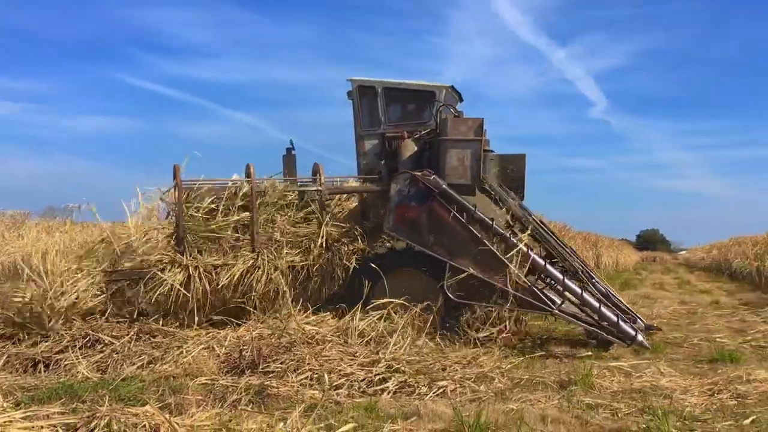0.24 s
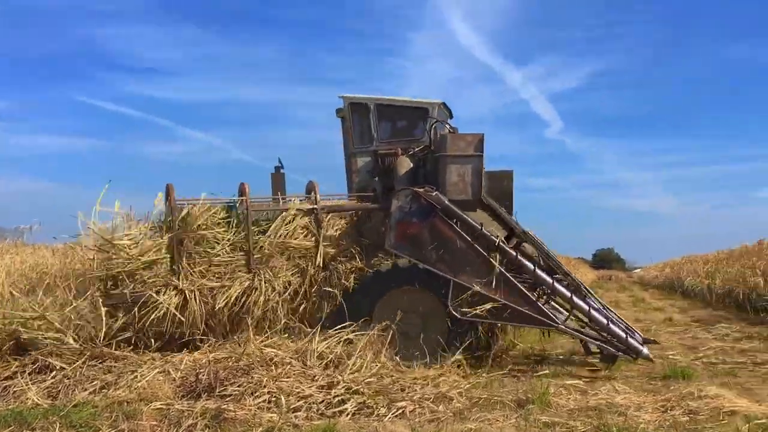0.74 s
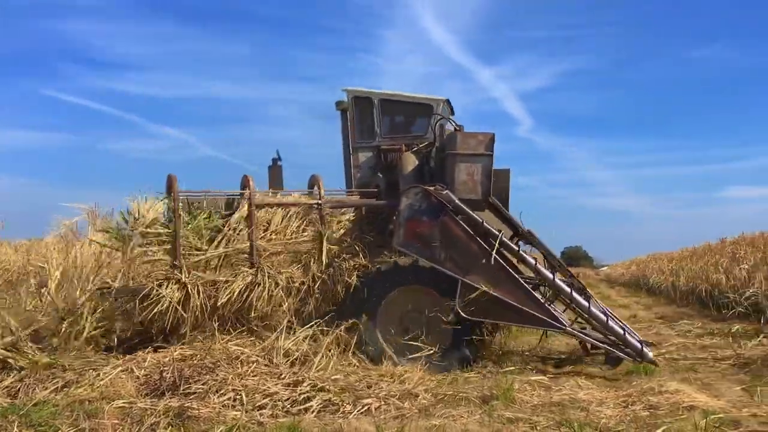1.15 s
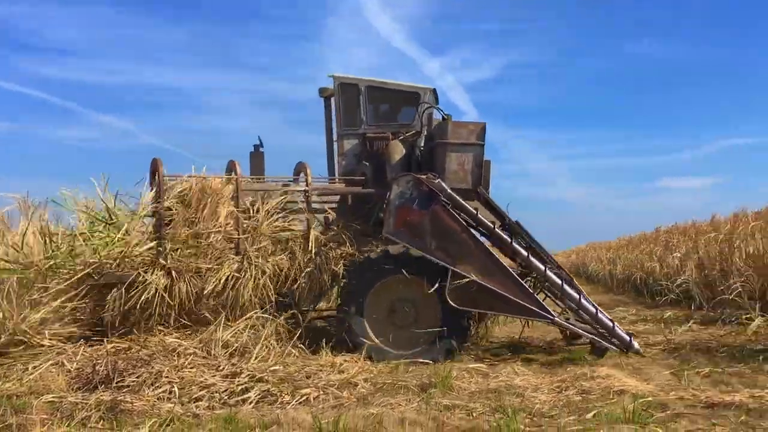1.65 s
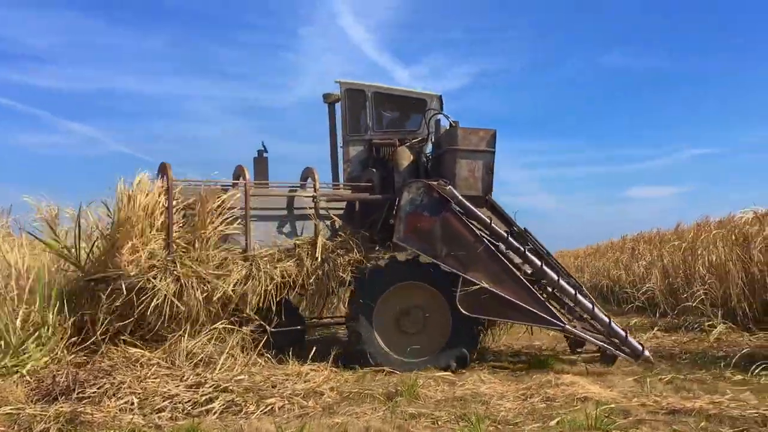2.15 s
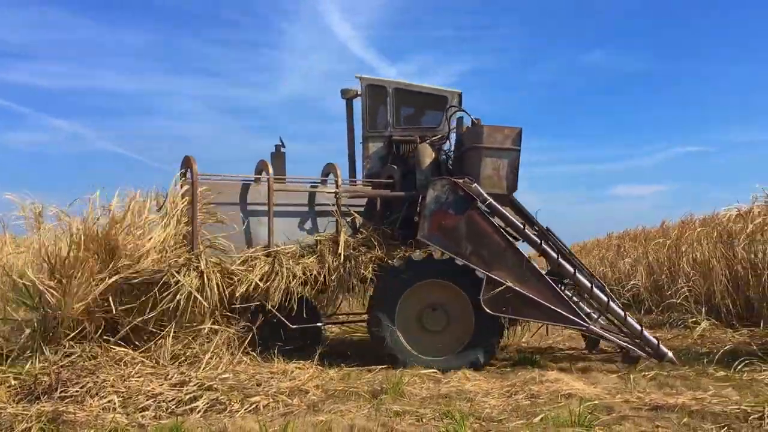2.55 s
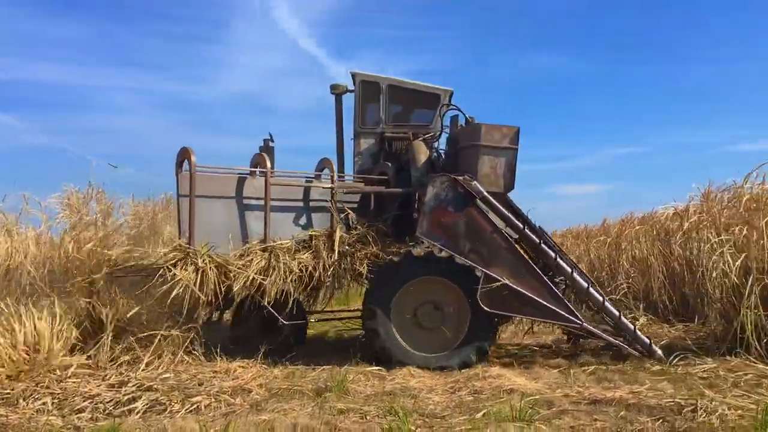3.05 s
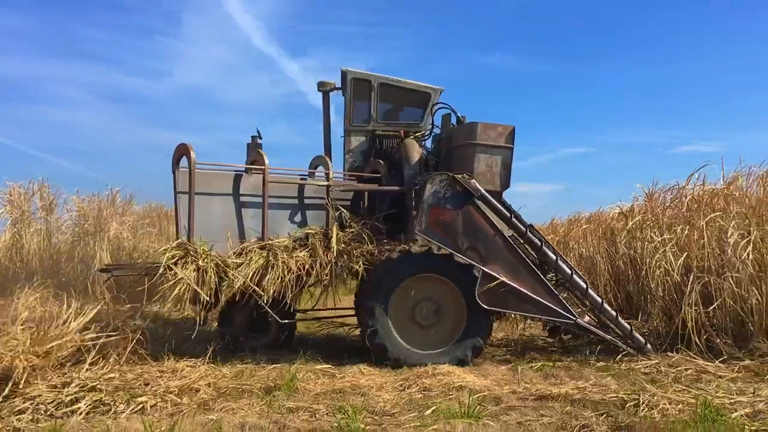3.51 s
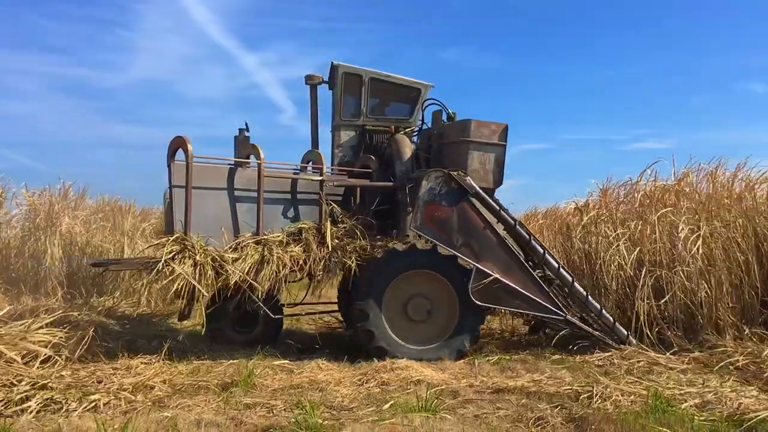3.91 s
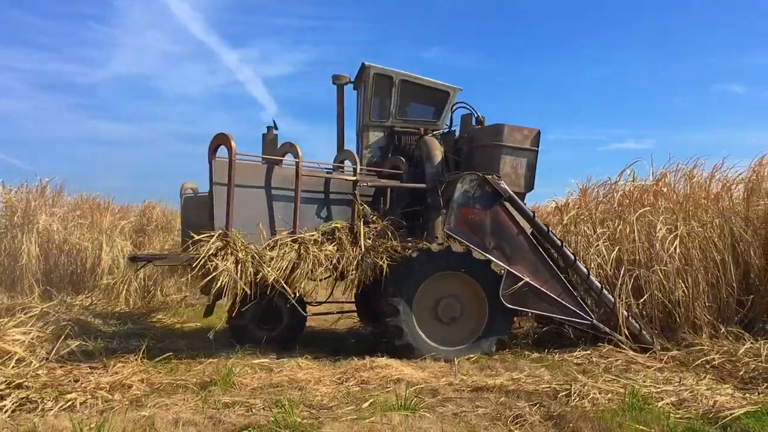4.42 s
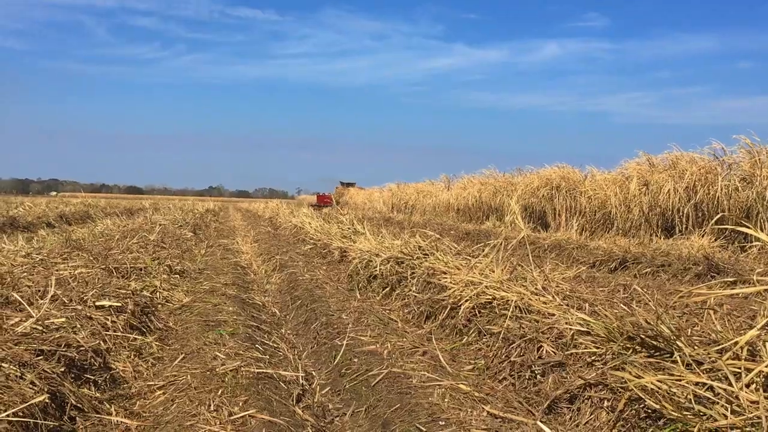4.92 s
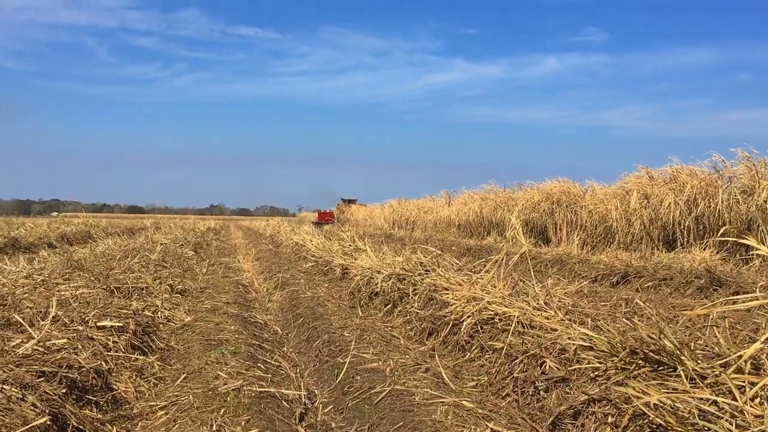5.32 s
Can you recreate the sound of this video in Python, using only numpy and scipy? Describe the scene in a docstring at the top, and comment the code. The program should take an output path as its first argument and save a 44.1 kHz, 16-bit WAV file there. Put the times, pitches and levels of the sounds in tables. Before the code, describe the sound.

A large diesel harvester runs at steady speed close to the microphone in an open cane field from 0 to about 4.6 seconds. A low, even hum near 100 hertz with its octave sits under rumbling exhaust, a broad midrange clatter and faint gear and fan whine. Dry stalks thrash in a bright, crackling hiss. Metal conveyor clanks recur roughly every quarter second, and short, rough high chain squeaks appear at the start, around 0.6 to 0.8, near 3.0 and in a cluster around 4.1 to 4.6. From 2 to 3.6 seconds the low hum strengthens while the cane hiss eases slightly; rumble swells gently around 2.5. Low wind gusts are mostly masked. At 4.63 the sound stops abruptly, leaving a tiny gap. From 4.66 to the end, a far quieter, airy machine roar fades gradually over barely audible hum, with brief dry leaf rustles and soft low wind buffeting.

```python
"""In a cane field, a six-cylinder diesel harvester works past at close range: firing-rate tones, noise bursts
for exhaust and clatter, gear and fan tones, and dry cane made of patchy, crackling noise.
Noise blows on a resonant frame clank once a conveyor turn, rough sine chirps are the chains.
After an abrupt cut the machine is far down the field, with noise-made dry leaves and wind on the microphone."""
import sys
import numpy as np
from scipy import signal
from scipy.fft import rfft, irfft, next_fast_len
from scipy.io import wavfile
from scipy.ndimage import uniform_filter1d, map_coordinates

SR = 44100
rng = np.random.default_rng(int(sys.argv[2]) if len(sys.argv) > 2 else 0)


def store_pcm(level_fs):
    """Save levels as 16-bit WAV."""
    pcm = np.round(np.clip(level_fs, -1, 1) * 32767).astype(np.int16)
    wavfile.write(sys.argv[1], SR, np.atleast_2d(pcm).T)


N = 245637

# Lines of the unequal cylinders: order [multiples of the four-stroke cycle rate]
UNEVEN_ORDERS = [4, 18, 22, 24, 36, 51, 54, 57, 66, 99]
# Level of each of those lines: level_db [dB]
UNEVEN_LEVELS = [-40, -54.5, -49, -44.5, -51, -48, -46, -45.5, -49, -49]
# Spectra, before scaling to rms 1: pitch_hz [Hz], level_db [dB, relative]
# Exhaust rumble; the reflection off the ground hollows out 500 Hz: pitch_hz, level_db
EXHAUST_SPECTRUM = [(20, -42), (32, -19), (45, -14.5), (80, -7.5), (115, -1), (150, 3), (185, -2.5),
                    (220, -6.5), (275, -6), (370, -6), (430, -14.5), (490, -22), (700, -45)]
# Diesel clatter and machinery: pitch_hz, level_db
CLATTER_SPECTRUM = [(250, -22), (480, -13.5), (600, -2), (760, -0.5), (950, 2.5), (1130, -1), (1450, -2),
                    (1900, -4.5), (2350, -8.5), (2550, -7), (3050, -15.5), (5000, -17.5), (10000, -36.5)]
# Dry stalks thrashing: pitch_hz, level_db
CANE_SPECTRUM = [(1200, -13), (2800, -2), (3500, 2), (4400, -2), (4900, -3.5), (5800, 2.5), (6900, 0),
                 (8500, 1), (9800, -2), (10500, -7), (11800, -5), (13500, -9), (15800, -14)]
# Roar of the far machine: pitch_hz, level_db
FAR_SPECTRUM = [(150, -27), (240, -7.5), (400, -6), (520, -10.5), (750, -4), (950, -1.5), (1400, 2),
                (1900, 0), (2500, -3.5), (3800, -5.5), (4500, -10), (6000, -27), (8000, -37)]
# Dry leaves stirring: pitch_hz, level_db
LEAF_SPECTRUM = [(3000, -15), (5000, -1), (5600, 5), (6700, 2.5), (7500, -2.5), (8600, -0.5), (9500, -5),
                 (10600, -12), (12500, -14), (15800, -28)]
# Wind on the microphone: pitch_hz, level_db
WIND_SPECTRUM = [(20, -42), (31, -28), (41, -2.5), (65, -7), (120, -14), (180, -18.5), (240, -23.5),
                 (320, -37), (600, -57)]
# Resonances of the conveyor frame: pitch_hz [Hz], width_hz [Hz], level_db [dB, relative]
FRAME_MODES = [(1560, 570, 2.5), (2740, 520, 2.5), (4400, 750, -2.5), (6260, 1200, -6.5), (9150, 2000, -14)]
# Loud chain chirps: peak_s [s], pitch_hz [Hz], half_length_s [s], level_db [dB, peak]
LOUD_CHIRPS = [(.045, 7550, 0.031, -30.5), (.582, 7350, .02, -30.5), (.657, 8050, .028, -34),
               (.772, 9900, .018, -33), (1.775, 13000, .022, -37), (3.017, 5800, 0.013, -28.5),
               (3.072, 5750, .014, -33), (4.084, 9460, .03, -30.5), (4.128, 5550, .015, -31),
               (4.14, 9900, .025, -36), (4.197, 7270, 0.015, -31), (4.438, 5850, .035, -36.5),
               (4.568, 7600, .028, -33.5)]
# Swell of the cooling fan tones: peak_s [s], half_length_s [s], level_db [dB]
FAN_SWELLS = [(.95, 0.38, -39)]
# Swell of the gear whine as the gearbox comes abreast: peak_s [s], half_length_s [s], level_db [dB]
GEAR_SWELLS = [(4.27, 0.6, -38)]
# Conveyor strikes with their own time and level: start_s [s], level_db [dB, before the frame]
LISTED_STRIKES = [(.773, -29.5), (1.326, -33), (1.587, -34.5), (2.134, -31.5), (2.67, -30)]
# Gusts on the microphone: peak_s [s], half_length_s [s], level_db [dB]
WIND_GUSTS = [(.2, 0.17, -38), (1.82, .16, -36), (3.52, 0.32, -33), (4.3, 0.4, -38), (4.768, 0.025, -37)]
# Brief stirs of the leaves: peak_s [s], half_length_s [s], level_db [dB]
LEAF_STIRS = [(4.74, 0.21, -55), (5.28, .09, -52.5), (5.57, 0.088, -56)]

TOP_HZ = 15800
CYLINDERS = 6
NEAR_FIRING_HZ, FAR_FIRING_HZ = 98.35, 96.6
# The close view ends, then the far view starts; the fade-out is a time constant
CUT_S, RESUME_S = 4.629, 4.664
FADE_OUT_S, FADE_IN_S = 0.0032, 0.017
# The cane chute moves off and the engine side comes round between these times
TURN_FROM_S, TURN_TO_S = 1.94, 3.57
# Level with the chute facing, and the change once the engine side faces
DRONE_DB, DRONE_GAIN_DB = -30.5, 6
CLATTER_DB, CLATTER_GAIN_DB = -29, 0.52
CANE_DB, CANE_GAIN_DB = -33, -3
# The drone's octave dips slowly as the machine turns
OCTAVE_DB, DIP_DB, DIP_AT_S, DIP_HALF_S = -33.5, 12, 2.86, 1.6
# Exhaust and clatter swell as the machine passes closest
EXHAUST_DB, EXHAUST_SWELL_DB, CLATTER_SWELL_DB = -29, 2.5, 0.86
CLOSEST_AT_S, CLOSEST_HALF_S = 2.54, 2.6
GEAR_DB, FAN_DB = -44, -46.5
# Conveyor: clank levels are before the frame and its gain
FIRST_CLANK_S, TURN_S = 0.226, 0.2725
CLANK_DB, CLANK_SCATTER_DB, FRAME_GAIN_DB = -34, 0.8, 14.5
FAINT_CHIRP_DB, FAINT_CHIRP_HALF_S, FAINT_LOW_HZ, FAINT_HIGH_HZ = -43, 0.016, 5420, 10030
NEAR_WIND_DB, FAR_WIND_DB = -43, -45.5
FAR_DB, FAR_FADE_DB_PER_S = -41.5, 4
LEAVES_DB = -57.5


def amp(db):
    """Decibels to gain."""
    return 10 ** (np.asarray(db) / 20)


def unit(x):
    """Scale to rms 1."""
    return x / np.sqrt(np.mean(x ** 2) + 1e-20)


def clock():
    """The time of each sample in seconds."""
    return np.arange(N) / SR


def wobble(rate_hz):
    """A smooth random curve with rate_hz knots a second."""
    knots = rng.standard_normal(int(N * rate_hz / SR) + 4)
    return map_coordinates(knots, [clock() * rate_hz])


def noise():
    """Fresh white noise."""
    return rng.standard_normal(N)


def filtered(x, response):
    """Shape x with a frequency response, padded so that the tail does not wrap."""
    size = next_fast_len(N + 8192)
    return irfft(rfft(x, size) * response(np.fft.rfftfreq(size, 1 / SR)), size)[:N]


def coloured(x, spectrum):
    """Shape x through spectrum points on a log pitch axis, at rms 1."""
    pitch_hz, level_db = np.transpose(spectrum)
    return unit(filtered(x, lambda hz: amp(np.interp(np.log(hz + 1), np.log(pitch_hz), level_db))))


def blend(a, b, share):
    """Mix two textures so that b has the given share of the power."""
    return np.sqrt(1 - share) * unit(a) + np.sqrt(share) * unit(b)


def bump(peak_s, half_s):
    """A smooth rise to 1 at peak_s and an equal fall."""
    return np.cos(np.pi / 2 * np.clip((clock() - peak_s) / half_s, -1, 1)) ** 2


def swells(rows, steady_db):
    """Gain of a steady level and smooth swells, summed in power."""
    power = amp(steady_db) ** 2
    for peak_s, half_s, level_db in rows:
        power = power + (amp(level_db) * bump(peak_s, half_s)) ** 2
    return np.sqrt(power)


def facing():
    """0 while the cane chute faces the listener, rising to 1 as the engine side comes round."""
    return np.clip((clock() - TURN_FROM_S) / (TURN_TO_S - TURN_FROM_S), 0, 1)


def crank(firing_hz, hunt_hz=0.1176):
    """Engine cycles turned so far; the governor hunts a little around its speed."""
    return np.cumsum(firing_hz + hunt_hz * wobble(2)) / SR / CYLINDERS


def tone(cycle, order, waver_db, drift_rad=0):
    """A multiple of the engine cycle at rms 1; level and phase waver in the moving air."""
    phase = 2 * np.pi * (order * cycle + rng.random()) + drift_rad * wobble(12)
    return unit(amp(waver_db * wobble(9)) * np.sin(phase))


def firings(cycle, uneven_db, decay, repeat):
    """A noise burst per cylinder, decay in firing intervals; a share of its power repeats each cycle."""
    stroke = cycle * CYLINDERS
    cylinder = np.arange(CYLINDERS)
    imbalance = np.sin(2 * np.pi * cylinder / CYLINDERS) + (cylinder % 3 == 0) - 1 / 3
    strength = amp(uneven_db * unit(imbalance))
    burst = strength[stroke.astype(int) % CYLINDERS] * np.exp(-(stroke % 1) / decay)
    pattern = rng.standard_normal(int(N / cycle[-1]))
    same = map_coordinates(pattern, [cycle % 1 * len(pattern)], mode="grid-wrap")
    return unit(burst * blend(noise(), same, repeat))


def crackle(rate_hz, spread_db):
    """Random tiny snaps with a short ring-down, a few much larger than the rest."""
    size = amp(spread_db * np.minimum(rng.exponential(size=N), 5))
    snaps = (rng.random(N) < rate_hz / SR) * size ** 2
    power = signal.lfilter([1], [1, -np.exp(-1 / (0.00085 * SR))], snaps)  # 0.85 ms power decay
    return unit(np.sqrt(np.abs(power)) * noise())


def patchy(x, depth_db):
    """Ever-changing stalks and panels ring: narrow patches of the spectrum swell and fade."""
    spectrum = signal.stft(x, nperseg=1024)[2]
    field = uniform_filter1d(rng.standard_normal(spectrum.shape), size=5, axis=0)  # across pitch
    field = uniform_filter1d(field, size=6, axis=1)  # across time
    return unit(signal.istft(spectrum * amp(depth_db * unit(field)), nperseg=1024)[1][:N])


def exhaust_drone(cycle):
    """The firing rate and its octave hum as two tones."""
    drone = amp(DRONE_DB + DRONE_GAIN_DB * facing()) * tone(cycle, order=6, waver_db=0)
    octave_db = OCTAVE_DB - DIP_DB * bump(DIP_AT_S, DIP_HALF_S)
    return drone + amp(octave_db) * tone(cycle, order=12, waver_db=0.5)


def uneven_cylinders(cycle):
    """Unequal cylinders add wavering lines at multiples of the cycle rate."""
    return sum(amp(level_db) * tone(cycle, order, waver_db=2.5, drift_rad=0.53)
               for order, level_db in zip(UNEVEN_ORDERS, UNEVEN_LEVELS))


def gear_whine(cycle):
    """The timing gear sings at a high multiple of the engine cycle."""
    return swells(GEAR_SWELLS, GEAR_DB) * tone(cycle, order=88, waver_db=2.5, drift_rad=0.9)


def cooling_fan(cycle):
    """The fan and its drive make a pair of tones locked to the engine."""
    pair = tone(cycle, order=39.5, waver_db=2, drift_rad=0.4)
    pair += 0.9 * tone(cycle, order=36, waver_db=2, drift_rad=0.4)
    return swells(FAN_SWELLS, FAN_DB) * pair


def exhaust_rumble(cycle):
    """Exhaust puffs, one noise burst a firing, give the low rumble."""
    level_db = EXHAUST_DB + EXHAUST_SWELL_DB * bump(CLOSEST_AT_S, CLOSEST_HALF_S)
    return amp(level_db) * coloured(firings(cycle, uneven_db=0, decay=4.8, repeat=0.042), EXHAUST_SPECTRUM)


def diesel_clatter(cycle):
    """Combustion knocks excite ringing panels and blur into a machinery roar."""
    knocks = patchy(firings(cycle, uneven_db=-0.15, decay=11, repeat=0.098), depth_db=0.9)
    level_db = CLATTER_DB + CLATTER_GAIN_DB * facing()
    level_db += CLATTER_SWELL_DB * bump(CLOSEST_AT_S, CLOSEST_HALF_S) + 0.26 * wobble(24.24)
    return amp(level_db) * coloured(knocks, CLATTER_SPECTRUM)


def thrashing_cane():
    """Dry stalks thrash through the chains: hiss and snaps in shifting spectral patches."""
    stalks = patchy(blend(noise(), crackle(rate_hz=700, spread_db=3), share=0.21), depth_db=1.78)
    feed_db = 0.31 * wobble(4.92) + 0.34 * wobble(35.32)
    return amp(CANE_DB + CANE_GAIN_DB * facing() + feed_db) * coloured(stalks, CANE_SPECTRUM)


def buffeting(steady_db):
    """Wind on the microphone: low noise in a steady breeze and its gusts."""
    return swells(WIND_GUSTS, steady_db) * coloured(noise(), WIND_SPECTRUM)


def chains(faint_count=14):
    """Dry chain pins stick and slip in brief, rough, high chirps, some faint and random."""
    faint = []
    for when, pitch in rng.random((faint_count, 2)):
        pitch_hz = FAINT_LOW_HZ + pitch * (FAINT_HIGH_HZ - FAINT_LOW_HZ)
        faint.append((when * CUT_S, pitch_hz, FAINT_CHIRP_HALF_S, FAINT_CHIRP_DB))
    slip_rad = 0.5 * wobble(900) + 1.6 * wobble(160)  # roughens the pitch
    return sum(amp(level_db) * bump(peak_s, half_s) * np.sin(2 * np.pi * pitch_hz * clock() + slip_rad)
               for peak_s, pitch_hz, half_s, level_db in LOUD_CHIRPS + faint)


def frame_response(hz):
    """Steel frame resonances, summed with alternating polarity."""
    total = 0
    for k, (pitch_hz, width_hz, level_db) in enumerate(FRAME_MODES):
        damping = 1j * hz * width_hz
        total = total + (-1) ** k * amp(level_db) * damping / (pitch_hz ** 2 - hz ** 2 + damping)
    return total


def conveyor(t60_s=0.11, rise_s=0.0012):
    """Links rattle on the steel frame each turn, some at their own time and strength: noise rings its modes."""
    regular = []
    for start_s in np.arange(FIRST_CLANK_S, CUT_S, TURN_S):
        # a listed strike takes the place of the regular one
        if all(abs(start_s - listed_s) > TURN_S / 2 for listed_s, _ in LISTED_STRIKES):
            regular.append((start_s, CLANK_DB + CLANK_SCATTER_DB * rng.standard_normal()))
    blows = np.zeros(N)
    for start_s, level_db in regular + LISTED_STRIKES:
        age_s = np.maximum(clock() - start_s, 0)
        blows += amp(level_db - 60 * age_s / t60_s) * (1 - np.exp(-age_s / rise_s))
    return amp(FRAME_GAIN_DB) * filtered(blows * noise(), frame_response)


def grounded(x, delay_s=0.00104, strength=0.18):
    """The bounce off the flat field arrives a little late and combs the spectrum."""
    return unit(filtered(x, lambda hz: 1 + strength * np.exp(-2j * np.pi * hz * delay_s)))


def far_machine(cycle):
    """Across the field: a fading roar of firing bursts over faint hum and whine tones."""
    bursts = patchy(firings(cycle, uneven_db=0.4, decay=3.4, repeat=0.056), depth_db=1.4)
    roar_db = FAR_DB - FAR_FADE_DB_PER_S * np.maximum(clock() - RESUME_S, 0) + 0.61 * wobble(7)
    roar = amp(roar_db) * grounded(coloured(bursts, FAR_SPECTRUM))
    hum = amp(-53.5) * tone(cycle, order=6, waver_db=3)
    hum += amp(-56.5) * tone(cycle, order=12, waver_db=3.5)
    whine = amp(-61) * tone(cycle, order=88, waver_db=3, drift_rad=1.2)
    whine += amp(-64) * tone(cycle, order=60, waver_db=3, drift_rad=0.5)
    return roar + hum + whine


def dry_leaves():
    """Light wind stirs dry leaves: patchy hiss with small snaps, swelling briefly."""
    rustle = patchy(blend(noise(), crackle(rate_hz=290, spread_db=3.5), share=0.16), depth_db=2)
    return swells(LEAF_STIRS, LEAVES_DB) * coloured(rustle, LEAF_SPECTRUM)


def scene():
    """The close machine, a blink of silence, then the far one, alike in both channels."""
    t, cycle = clock(), crank(NEAR_FIRING_HZ)
    near = exhaust_drone(cycle) + uneven_cylinders(cycle) + gear_whine(cycle) + cooling_fan(cycle)
    near += exhaust_rumble(cycle) + diesel_clatter(cycle) + thrashing_cane()
    near += buffeting(NEAR_WIND_DB) + chains() + conveyor()
    far = far_machine(crank(FAR_FIRING_HZ)) + dry_leaves() + buffeting(FAR_WIND_DB)
    fade_out = np.exp(-np.maximum(t - CUT_S, 0) / FADE_OUT_S)
    fade_in = np.clip((t - RESUME_S) / FADE_IN_S, 0, 1)
    mono = fade_out * near + fade_in * far
    return np.array([mono, mono])


def record(dry):
    """Remove everything from the band limit upward."""
    return np.array([filtered(channel, lambda hz: hz < TOP_HZ) for channel in dry])


dry = scene()
out = record(dry)
store_pcm(out)
```